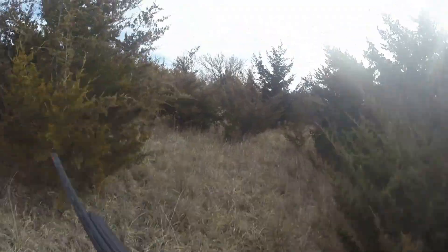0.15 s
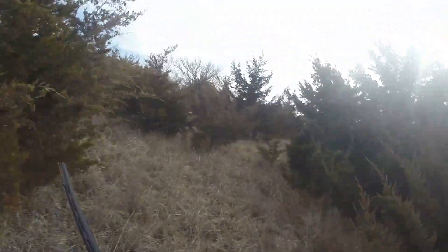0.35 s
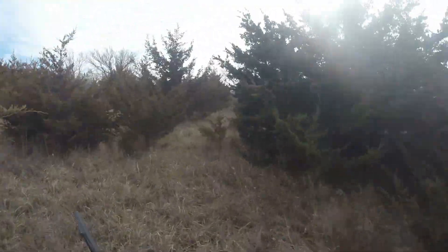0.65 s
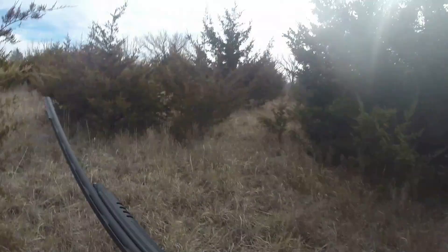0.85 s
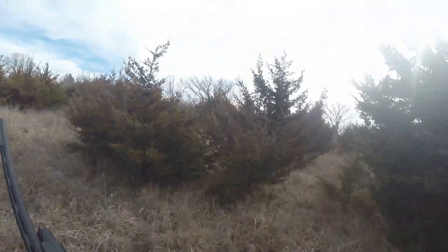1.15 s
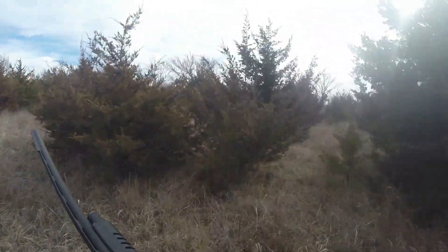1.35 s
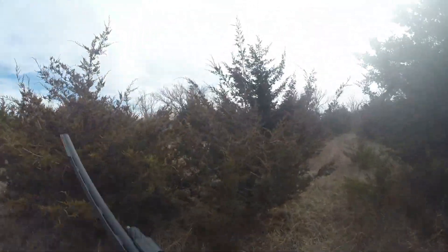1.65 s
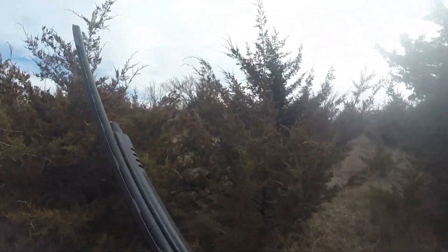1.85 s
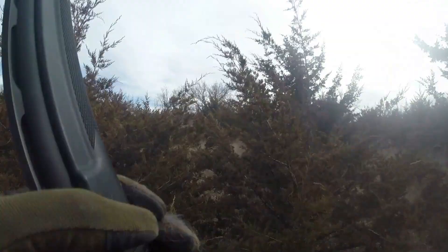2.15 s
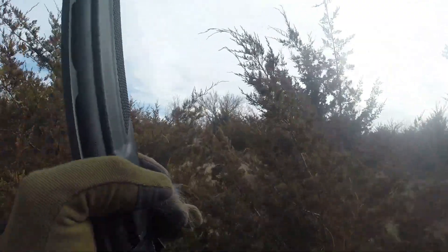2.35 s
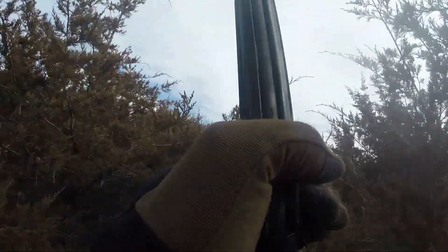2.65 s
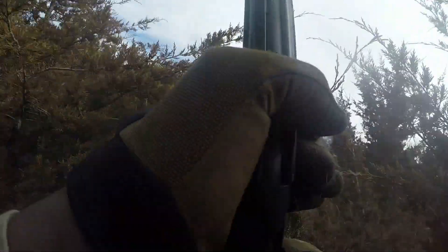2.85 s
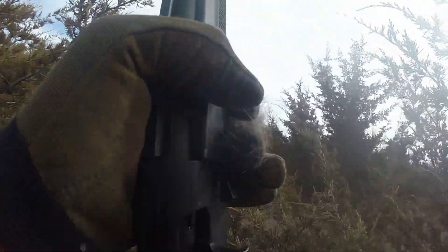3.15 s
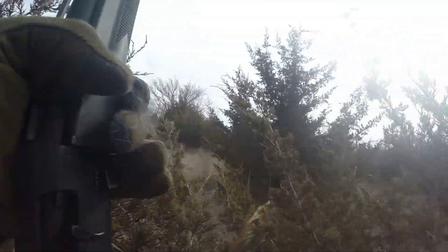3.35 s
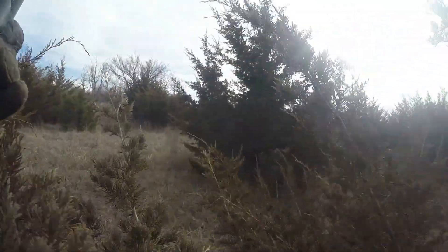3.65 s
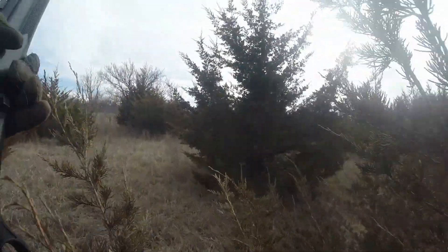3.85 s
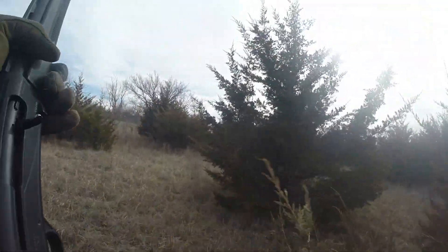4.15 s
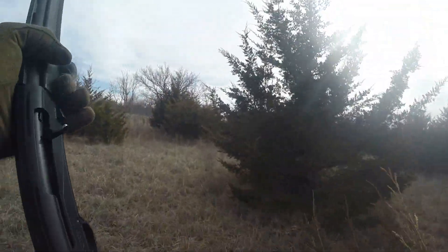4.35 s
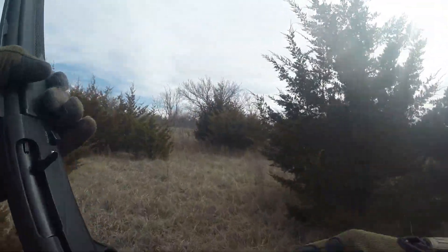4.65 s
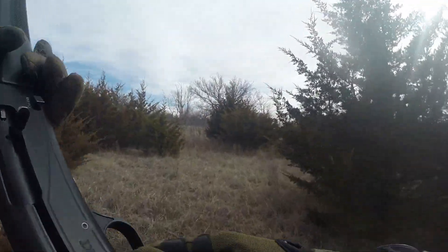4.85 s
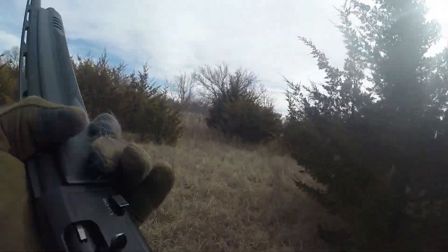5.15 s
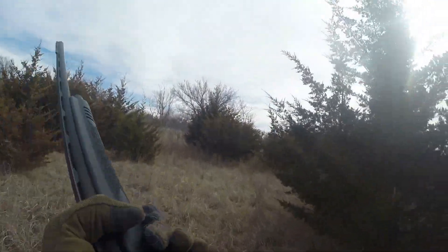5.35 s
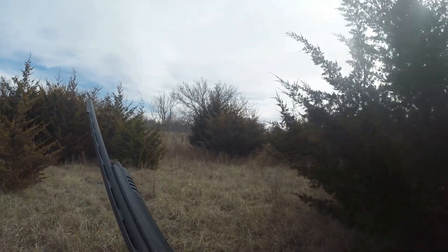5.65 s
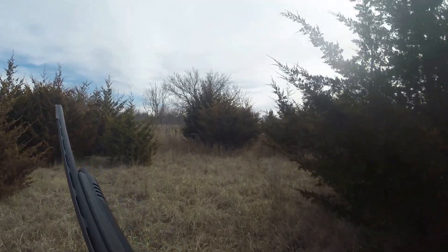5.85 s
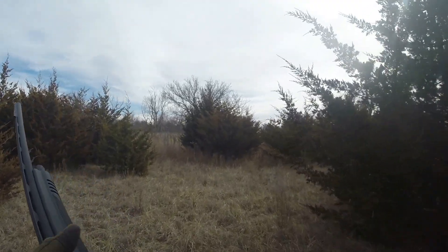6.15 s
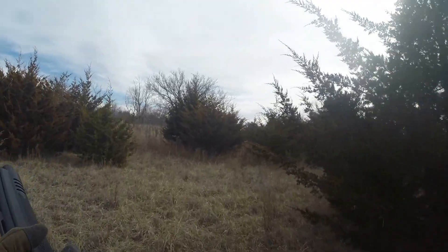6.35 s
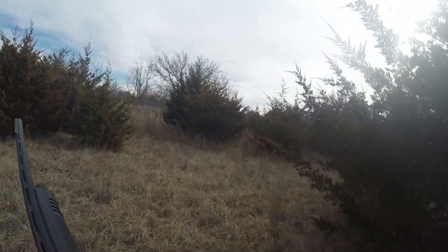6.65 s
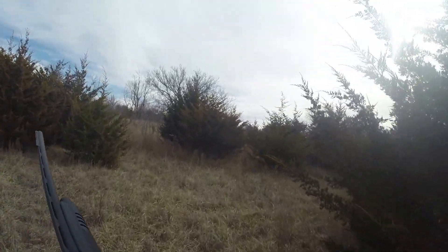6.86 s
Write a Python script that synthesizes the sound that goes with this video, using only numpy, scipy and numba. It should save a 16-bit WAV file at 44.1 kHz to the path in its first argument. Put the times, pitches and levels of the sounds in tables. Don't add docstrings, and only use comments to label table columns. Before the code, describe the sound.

Someone pushes through dry grass and cedar brush carrying a long gun. At first it is dense: low jolts, boxy plastic knocks, crunching stems and twig scuffs. It thins into gentle sweeps, then two very hard metal clacks cut through, about a second apart, briefly ducking everything around them. Afterwards only small ticks, bumps and faint grass stirring. Everything is muffled and hollow, heard from inside a body-mounted housing, dry and close.

```python
import sys
import numpy as np
from scipy import signal
from scipy.fft import rfft, irfft
from scipy.io import wavfile
from scipy.ndimage import uniform_filter1d, minimum_filter1d
from numba import njit

SR = 44100
rng = np.random.default_rng(int(sys.argv[2]) if len(sys.argv) > 2 else 0)


def invert_db(level):
    return 10 ** (np.asarray(level, dtype=float) / 20)


def wrap_up_sound(samples):
    columns = np.atleast_2d(samples).T
    tamed = np.clip(columns, -1, 1)
    steps = np.round(tamed * 32767).astype(np.int16)
    wavfile.write(sys.argv[1], SR, steps)


N = 309582

# pitch_hz, width_hz, level_db
HOLLOW_MODES = [(300, 150, -4), (571, 74, 12), (1034, 56, 8.5), (1270, 500, -0.5)]
SHELL_MODES = [(1950, 300, -5), (2380, 420, 0)]
PORT_MODES = [(3500, 450, -3), (4000, 450, 0), (5050, 400, -10), (6200, 700, -8)]
AIR_MODES = [(7860, 170, -10), (10020, 850, -10), (12100, 1600, -14.5)]


def rms_one(x):
    return x / np.sqrt(np.mean(x ** 2) + 1e-20)


def power_sum(*levels_db):
    return 10 * np.log10(sum(invert_db(2 * level) for level in levels_db))


def drift(rate_hz):
    r = np.exp(-80 * np.pi * rate_hz / SR)
    slow = signal.lfilter([1], [1, -2 * r, r * r], rng.standard_normal(N // 40 + 2002))[2000:]
    return np.interp(np.arange(N) / 40, np.arange(len(slow)), rms_one(slow))


def two_pole(x, hz, sign):
    k = np.tan(np.pi * min(hz, .45 * SR) / SR)
    b = np.array([1, 2 * sign, 1]) * (k * k if sign > 0 else 1)
    a = [1 + np.sqrt(2) * k + k * k, 2 * (k * k - 1), 1 - np.sqrt(2) * k + k * k]
    return signal.lfilter(b, a, x)


def low_pass(x, hz):
    return two_pole(x, hz, sign=1)


def high_pass(x, hz):
    return two_pole(x, hz, sign=-1)


def resonate(x, hz, width_hz):
    r = np.exp(-np.pi * width_hz / SR)
    a = [1, -2 * r * np.cos(2 * np.pi * hz / SR), r * r]
    return signal.lfilter([(1 - r * r) / 2, 0, (r * r - 1) / 2], a, x)


@njit
def glide(x, hz, r, step):
    y = np.zeros(len(x))
    for i in range(2, len(x)):
        y[i] = x[i] - x[i - 2] + 2 * r * np.cos(step * hz[i]) * y[i - 1] - r * r * y[i - 2]
    return y


def body(x, modes):
    return sum((-1) ** k * invert_db(db) * resonate(x, hz, width_hz) for k, (hz, width_hz, db) in enumerate(modes))


def coloured(spectrum):
    hz = np.arange(N // 2 + 1) * SR / N + 1
    points_hz, points_db = np.transpose(spectrum)
    shape = invert_db(np.interp(np.log(hz), np.log(points_hz), points_db, left=-80, right=-80))
    return rms_one(irfft(rfft(rng.standard_normal(N)) * shape, N))


def crackle(per_s, spread_db, smooth):
    sizes = invert_db(spread_db * np.minimum(rng.exponential(1, N), 5)) * rng.choice([-1, 1], N)
    born = rng.random(N) < per_s * invert_db(4 * drift(15)) / SR
    return rms_one(sizes * born) + smooth * rng.standard_normal(N)


def electronics():
    # pitch_hz, level_db_per_hz
    hiss_spectrum = [(120, -39.5), (200, -2.5), (585, -6.5), (798, -16), (1010, -9), (1190, -15),
                     (2380, -16), (3070, -19), (5110, -19), (12200, -44.5), (15500, -51.5)]
    # pitch_hz, width_hz, rms_db
    whine_lines = [(5060, 70, -70.5), (10000, 200, -85), (12645, 10, -94)]
    out = invert_db(-56.5) * coloured(hiss_spectrum)
    for hz, width_hz, db in whine_lines:
        whine = resonate(resonate(rng.standard_normal(N), hz, width_hz), hz, width_hz)
        out = out + invert_db(db) * rms_one(whine)
    return out


def rubbing():
    # time_s, rub_db
    pressure = [(0.0, -32.5), (0.2, -44.5), (0.39, -44.5), (0.6, -58), (0.75, -40), (1.06, -47), (1.4, -42),
                (1.66, -40), (1.93, -54.5), (2.19, -53.5), (2.45, -58.5), (3.1, -63.5), (3.44, -49),
                (3.7, -53), (4.45, -51), (4.75, -61), (5.25, -62.5), (7.02, -66)]
    # centre_s, half_length_s, level_db
    presses = [(0.124, .035, -29.5), (0.29, .03, -41), (0.436, .03, -41), (.51, .025, -36.5),
               (0.739, .04, -42.5), (0.827, 0.05, -38), (0.94, .04, -40), (1.018, 0.017, -43.5),
               (1.138, .04, -42.5), (1.306, 0.027, -37), (1.74, .03, -42), (1.884, .02, -49.5),
               (2.023, .025, -48.5), (2.153, 0.051, -43.5), (2.267, 0.045, -42), (2.334, .02, -44.5),
               (2.518, .025, -52.5), (2.64, 0.032, -59.5), (2.809, .05, -46), (3.627, .03, -54.5),
               (3.811, .05, -50), (4.123, .06, -54), (4.422, 0.033, -46), (4.541, .015, -40.5),
               (4.926, 0.028, -57), (5.04, .035, -54.5), (5.404, .03, -52), (5.477, 0.044, -55.5),
               (5.67, .04, -53), (5.792, .04, -51.5), (5.884, .04, -58), (6.372, 0.063, -60.5),
               (6.543, .04, -49.5), (6.668, .025, -58), (6.865, 0.056, -64.5), (6.982, .04, -65)]
    t = np.arange(0, N, 40) / SR
    bells = [db - 6 * ((t - s) / half_s) ** 2 for s, half_s, db in presses]
    return np.interp(np.arange(N) / SR, t, power_sum(np.interp(t, *np.transpose(pressure)), *bells))


def swishes():
    # centre_s, half_length_s, swish_db, airy_top_rel_db
    sweeps = [(0.143, 0.19, -55, -15), (0.38, 0.082, -53.5, -12.5), (0.747, 0.13, -61, -17),
              (0.98, 0.17, -57.5, -13), (1.253, 0.5, -61, -12.5), (1.443, 0.15, -76, -14),
              (1.658, 0.11, -60, -15), (2.003, 0.078, -56.5, -7.5), (2.2, 0.065, -54.5, -21),
              (2.64, 0.056, -58.5, -9), (2.8, 0.8, -60, -16), (3.2, 0.076, -52.5, -17),
              (3.363, 0.09, -58, -12.5), (4.055, 0.094, -49.5, -49), (4.287, 0.11, -55, -17),
              (4.485, 0.031, -56, -24), (5.4, 0.094, -72, -10), (5.54, 0.17, -66, -7),
              (5.85, 0.18, -86, -5), (6.3, 0.09, -73, 3), (6.547, 0.095, -84, -32),
              (6.805, 0.12, -92, -1.5)]
    still_db, still_air_db = -70, -76
    t = np.arange(0, N, 40) / SR
    bells = [(db - 6 * ((t - s) / half_s) ** 2, top_db) for s, half_s, db, top_db in sweeps]
    swish_db = power_sum(still_db, *[bell for bell, top_db in bells])
    air_db = power_sum(still_air_db, *[bell + top_db for bell, top_db in bells])
    return [np.interp(np.arange(N) / SR, t, level) for level in (swish_db, air_db)]


def rustle():
    shell_rub_db, shell_swish_db, port_rub_db = -2.5, 3.5, -21
    far_s, far_half_s, far_db = 6.32, 0.37, -64.5
    notch_hz, notch_width_hz, notch_depth = 2930, 620, 1
    rub_db = rubbing()
    grass_db, air_db = swishes()
    mid_db = power_sum(rub_db + shell_rub_db, grass_db + shell_swish_db)
    breeze_db = far_db - 6 * ((np.arange(N) / SR - far_s) / far_half_s) ** 2
    grass_db = power_sum(grass_db, breeze_db, rub_db + port_rub_db)
    stems = crackle(3500, spread_db=3.5, smooth=.9)
    together_db = 1.3 * drift(25)
    own_db = [1.3 * drift(30) for group in range(4)]
    hollow = rms_one(low_pass(body(stems, HOLLOW_MODES), 1600))
    shell = rms_one(low_pass(body(stems, SHELL_MODES), 3200))
    port = rms_one(low_pass(high_pass(body(stems, PORT_MODES), 3000), 7600))
    air = rms_one(high_pass(body(stems, AIR_MODES), 6500))
    levels_db = (rub_db, mid_db, grass_db, air_db)
    groups = zip(levels_db, own_db, (hollow, shell, port, air))
    mix = sum(invert_db(db + together_db + flicker_db) * part for db, flicker_db, part in groups)
    return mix - notch_depth * resonate(mix, notch_hz, notch_width_hz)


def crunch():
    level_db, follows_rub = -53.5, 0.98
    rub_db, grit = rubbing(), rng.standard_normal(N)
    breaks = np.abs(crackle(410, spread_db=1.5, smooth=0))
    bursts = grit * signal.lfilter([1], [1, -invert_db(-60 / (.02 * SR))], breaks)
    sound = low_pass(body(bursts, HOLLOW_MODES), 2300) + 0.76 * body(bursts, SHELL_MODES)
    sound = sound + 0.024 * body(bursts, PORT_MODES) + 0.28 * resonate(bursts, 3300, 1200)
    return invert_db(level_db + follows_rub * (rub_db - rub_db.mean())) * rms_one(sound)


def jolts():
    # time_s, level_db
    stir = [(0, -30.5), (.6, -40.5), (1.9, -42.5), (2.45, -53.5), (3.44, -48.5), (3.8, -49.5), (4.75, -54),
            (5.3, -55), (7.02, -52.5)]
    # peak_s, peak_db, build_up_s, settling_s (both over 20 dB)
    strides = [(.035, -8, 0.06, 0.071), (0.149, -14, 0.076, 0.022), (0.211, -17.5, 0.09, 0.039),
               (.343, -8.5, 0.028, 0.028), (0.502, -15.5, 0.13, 0.12), (.92, -12, .1, 0.038),
               (1.038, -25.5, .04, 0.019), (1.161, -27.5, 0.077, 0.23), (1.323, -11.5, 0.071, 0.053),
               (1.502, -8, 0.014, 0.015), (1.77, -17.5, 0.12, 0.063), (2.262, -21, .08, 0.09),
               (2.788, -37.5, 0.42, 0.4), (3.469, -25, 0.011, 0.077), (3.659, -38.5, 0.11, 0.036),
               (4.35, -45, .4, .3), (4.522, -38, .06, 0.036), (4.69, -40.5, 0.078, 0.013),
               (1.82, -22, 0.039, 0.023), (5.719, -38, 0.099, 0.075), (6.01, -39, 0.033, .05),
               (6.229, -50.5, 0.29, 0.21), (6.58, -47.5, 0.62, 0.29), (7.0, -50.5, 0.49, 0.18),
               (1.91, -31.5, .025, 0.042), (5.39, -45.5, .06, .08), (5.53, -40, 0.054, 0.066),
               (5.88, -46, .15, 0.071), (6.46, -50.5, .12, 0.074), (3.15, -44, .15, 0.28),
               (.67, -33.5, .05, 0.14), (1.63, -32, .06, 0.064), (5.62, -46, .05, 0.06)]
    t = np.arange(0, N, 40) / SR
    level_db = np.interp(t, *np.transpose(stir))
    for s, db, rise_s, fall_s in strides:
        level_db = np.maximum(level_db, db - 20 * np.maximum((s - t) / rise_s, (t - s) / fall_s))
    return np.interp(np.arange(N) / SR, t, level_db)


def shake():
    # pitch_hz, level_db_per_hz
    rumble_spectrum = [(12, -35), (20, 7.5), (65, -2), (124, -8), (155, -2.5), (201, -14), (293, -18),
                       (450, -44.5), (580, -62), (990, -120)]
    level_db = jolts()
    sway_hz = 116 + 1.28 * level_db
    rumble = coloured(rumble_spectrum)
    swing = glide(rng.standard_normal(N), sway_hz, np.exp(-np.pi * 40 / SR), 2 * np.pi / SR)
    swing = rms_one(low_pass(low_pass(swing, 200), 300))
    hard = np.clip((level_db + 65.0) / 35, .05, 1)
    both = swing * hard + rumble * (1.1 - 0.21 * hard)
    envelope = np.sqrt(uniform_filter1d(both ** 2, size=1100))
    lumps_db = 3 * drift(39)
    sway = invert_db(level_db + lumps_db) * rms_one(both / (envelope + 0.6))
    fittings = crackle(1500, spread_db=4.0, smooth=0.21)
    chatter = body(fittings, HOLLOW_MODES) + .45 * body(fittings, SHELL_MODES)
    chatter = chatter - .25 * resonate(fittings, 3400, 900)
    chatter = rms_one(low_pass(low_pass(chatter, 3800), 4500))
    return low_pass(low_pass(sway, 370), 290) + invert_db(level_db - 16.5) * chatter


def pings():
    # start_s, peak_db, pitch_hz, length_s
    contacts = [(.005, -25.5, 300, 0.13), (0.325, -25, 300, 0.037), (0.428, -42, 4840, 0.0021),
                (0.545, -7, 593, 0.0034), (.875, -13, 275, 0.019), (0.881, -21, 596, 0.012),
                (1.345, -44, 9000, 0.0018), (1.3608, -8, 3370, 0.0015), (1.359, -28.5, 8800, 0.0011),
                (1.365, -49, 9000, .002), (1.499, -13.5, 2150, 0.0043), (1.516, -17, 553, 0.0063),
                (1.519, -29, 3380, 0.0028), (1.597, -32, 4120, .006), (1.594, -42, 10500, .005),
                (1.597, -20.5, 533, 0.0056), (1.739, -24.5, 5100, 0.0039), (1.915, -37, 1810, 0.0042),
                (2.061, -53, 3700, .002), (2.631, -42, 5930, .004), (2.816, -40, 5950, 0.0039),
                (2.87, -44, 2900, .004), (2.901, -45.5, 300, 0.21), (3.143, -33, 2230, 0.023),
                (3.304, -53, 9000, .003), (3.349, -36.5, 685, 0.013), (3.67, -55, 7500, 0.0024),
                (4.124, -37.5, 1020, 0.036), (4.269, -49, 300, .04), (4.288, -32.5, 2210, 0.033),
                (4.504, -40, 4000, .004), (4.544, -44, 600, 0.0096), (4.575, -16, 3310, 0.0037),
                (4.585, -44.5, 7800, 0.004), (4.579, -20, 727, 0.019), (4.928, -64.5, 2220, .004),
                (4.99, -62, 10540, 0.0016), (5.071, -45, 578, 0.016), (5.119, -62.5, 12100, 0.0031),
                (6.377, -54, 2990, .015), (6.138, -51, 3000, 0.022), (0.8533, -12.5, 2110, 0.006),
                (5.44, -44.5, 900, 0.0046), (6.608, -46, 401, .008), (6.511, -53, 300, 0.044),
                (4.508, -31, 143, 0.045), (4.66, -37, 137, 0.039), (3.592, -28, 3950, 0.0022),
                (3.525, -47, 6100, .002), (3.55, -47, 6100, .002),
                (.034, -38, 6300, .006), (.0415, -16, 2200, .005), (.0415, -15, 1200, .006),
             (.064, -45, 8000, .003), (.073, -47, 8500, .003), (.128, -19, 3500, .004),
             (.217, -38, 3500, .003), (.402, -17, 2100, .007), (.425, -35, 3900, .003),
             (.523, -43, 6000, .008), (.523, -50, 9500, .003), (.53, -49, 8500, .004),
             (.8745, -25, 5500, .003), (.937, -44, 7800, .01), (.98, -30, 600, .014),
             (1.03, -32, 2200, .012), (1.448, -45, 6300, .01), (1.452, -53, 9500, .005),
             (1.488, -21, 2100, .005), (1.7385, -14, 1400, .006), (1.7385, -17, 2600, .005),
             (2.87, -52, 5800, .003), (4.504, -45, 6500, .004), (4.5715, -20, 5800, .005),
             (4.5785, -29, 10800, .003), (4.583, -31, 2300, .004), (4.612, -39, 130, .04),
             (4.941, -55, 6000, .004), (5.375, -57, 5500, .004), (5.384, -56, 5500, .004),
             (5.61, -50, 600, .006), (5.61, -54, 2300, .005), (5.88, -48, 370, .05), (5.94, -48, 400, .06),
             (6.03, -50, 420, .06), (6.07, -50, 330, .05), (6.13, -52, 350, .04)]
    out, t = np.zeros(N + 8000), np.arange(8000) / SR
    hits = contacts
    for (s, db, hz, length_s), noise in zip(hits, rng.standard_normal((len(hits), 8000))):
        puff = noise * (t / length_s) ** .5 * np.exp(-3.0 * t / length_s)
        width_hz = 0.28 * hz
        ping = resonate(resonate(puff, hz, width_hz), hz, width_hz)
        i = round(s * SR)
        out[i:i + 8000] += invert_db(db) * ping / np.abs(ping).max()
    return out[:N]


def knocks():
    # start_s, peak_db, pitch_hz, bright_db
    raps = [(0.041, -9.5, 1210, -31), (0.1148, -13, 1480, -14), (.1275, -7, 1070, -11.5),
            (.167, -12.5, 2130, -43), (0.177, -21, 650, -27), (.5443, -4, 1120, -13.5),
            (0.6137, -23, 1500, -30), (0.8741, -3, 1260, -14.5), (0.883, -10.5, 1800, -20),
            (1.3383, -22, 1130, -33), (1.3588, -17, 3550, -11), (1.364, -41, 3480, -6),
            (1.5189, -22, 1100, -36), (1.6615, -18.5, 1230, -31), (1.8047, -14, 1180, -12),
            (2.3011, -12, 2080, -18), (2.7181, -34.5, 2220, -20), (2.9551, -25, 1310, -30),
            (3.523, -49, 2130, -32), (3.541, -28, 1830, -4), (3.5567, -43.5, 2200, 15.5),
            (3.5916, -14, 2200, -30), (1.5899, -23, 2159, 4), (5.372, -43, 2120, -19),
            (5.6617, -41, 1050, -18), (5.6991, -36.5, 640, -25), (6.008, -36, 1270, -26.5),
            (6.404, -40.5, 3900, -12), (6.5586, -50, 1040, -16)]
    # start_s, peak_db, pitch_hz, bright_db
    scuffs = [(.1494, -19, 2020, -31), (0.2678, -30, 1300, -16), (0.38, -25.5, 1270, -30),
              (0.4011, -22.5, 2140, -30), (0.4313, -21.5, 1170, -15), (0.47, -24.5, 1030, -29),
              (0.8515, -12.5, 1500, -25), (.932, -29.5, 2130, -4), (1.136, -33.5, 960, -26),
              (1.484, -16.5, 1220, -16), (1.4977, -21.5, 2200, -43), (5.44, -45, 1490, -22),
              (1.7374, -12, 1370, -14), (1.784, -26.5, 1060, -14), (2.2395, -34, 1030, -22),
              (2.803, -34.5, 1320, -4), (2.8282, -36, 1370, -5), (3.145, -42.5, 3860, 1),
              (3.39, -47.5, 733, -3), (3.5114, -20.5, 2140, -10.5), (4.2906, -59, 2180, 4),
              (4.8024, -42, 1033, -16), (5.3868, -34.5, 1270, -26), (6.535, -42, 2124, -8.5),
              (6.525, -43, 1890, -11), (6.577, -44, 1300, -19.5), (5.36, -49, 2010, -26),
              (2.148, -32, 1990, -12), (4.66, -37.5, 3600, -19)]
    # start_s, peak_db, pitch_hz, bright_db
    bumps = [(0.2044, -26, 2030, -32), (0.3405, -22.5, 1370, -35), (0.3543, -25, 650, -29),
             (0.631, -35, 990, -31), (1.0116, -28, 1880, -17), (1.291, -27, 1030, -12),
             (1.4241, -37.5, 2070, -12), (1.447, -36.5, 1030, -5), (1.549, -39, 1010, -11),
             (1.912, -39, 634, -37), (1.941, -36, 650, -28), (2.588, -43, 680, -18),
             (3.594, -27.5, 900, -34), (3.669, -55, 1050, -7), (4.1768, -42.5, 2050, -23),
             (4.3207, -36.5, 670, -26), (4.4248, -42.5, 990, 0), (4.505, -35.5, 1040, -19),
             (4.525, -27.5, 1620, -23), (4.619, -21, 563, -43.5), (4.6457, -25.5, 571, -52.5),
             (4.676, -36, 592, -52), (4.726, -46, 553, -57.5), (4.9411, -44, 664, -3),
             (5.049, -49, 640, -19), (5.508, -45.5, 820, -13), (5.637, -38.5, 1860, -11),
             (5.798, -44, 2040, -20), (6.6317, -46.5, 2020, -1), (0.5449, -23, 1030, -40)]
    # hollow_db, t60_s
    kinds = [
        (-12.5, 0.017),
        (-7, 0.12),
        (3.5, 0.032),
    ]
    out, t = np.zeros(N + 4000), np.arange(4000) / SR
    hits = [row + kind for rows, kind in zip((raps, scuffs, bumps), kinds) for row in rows]
    noises = rng.standard_normal((len(hits), 4000))
    for (s, db, hz, bright_db, hollow_db, t60_s), noise in zip(hits, noises):
        burst = noise * np.minimum(t / (0.0055 * t60_s), 1) * invert_db(-60 * t / np.clip(t60_s, .004, .15))
        shell = min(hz / 2100, 1) ** 0.25
        spot = resonate(burst, hz, 0.17 * hz) + 0.54 * shell * body(burst, SHELL_MODES)
        spot = spot - 0.36 * resonate(burst, 2900, 740)
        spot = low_pass(low_pass(spot, 0.5 * hz + 1500), 2900)
        hollow = low_pass(body(burst, HOLLOW_MODES), 900)
        bright = high_pass(body(burst, PORT_MODES) + 0.42 * body(burst, AIR_MODES), 1900)
        cut_hz = 4500 * invert_db(0.35 * (bright_db + 6.5))
        bright = low_pass(low_pass(bright, cut_hz), cut_hz)
        gains = invert_db(np.array([0, hollow_db + 5.0, bright_db]))
        i = round(s * SR)
        out[i:i + 4000] += invert_db(db) * sum(g * p / np.abs(p).max() for g, p in zip(gains, (spot, hollow, bright)))
    return out[:N]


def snaps():
    # start_s, blow_db, burst_s, low_ring_db, middle_ring_db, high_ring_db
    blows = [
        (0.5434, -48, .0013, -31, -37, -69),
        (0.876, -33, 0.00051, -27, -48, -70),
        (3.464, 12, 0.0023, -15, -4, -30),
        (4.5678, 10.5, 0.0029, -62.5, -64, -61),
        (4.5709, 9.5, 0.0026, -4, -12, -18.5),
    ]
    # pitch_hz, t60_s, ring_group_index, level_db
    metal_modes = [(1814, .24, 0, 0), (1848, .12, 0, -16), (2132, .15, 1, 0), (2702, .15, 2, -10),
                   (2900, .13, 2, 0), (3138, .16, 2, -5), (3628, .1, 2, -8), (4390, .07, 2, -9)]
    from_hz, to_hz, sweep_s = 4500, 2250, .0008
    out, t = np.zeros(N + 16000), np.arange(16000) / SR
    turns = to_hz * t + (from_hz - to_hz) * sweep_s * (1 - np.exp(-t / sweep_s))
    wave = np.sin(2 * np.pi * turns)
    for (s, blow_db, burst_s, *ring_db), noise in zip(blows, rng.standard_normal((len(blows), 16000))):
        contact = invert_db(-60 * np.maximum(t - .6 * burst_s, 0) / (2.8 * burst_s))
        clean = float(burst_s < .0028)
        grit = (1.12 - clean) * 3.2 * resonate(resonate(noise, 2200, 800), 2250, 800)
        grit = grit + .16 * resonate(noise, 4200, 2500)
        grit = grit + (0.03 + .3 * (1 - clean)) * low_pass(high_pass(noise, 5000), 14000)
        grit = grit + 0.38 * clean * resonate(noise, 620, 900)
        rattle = low_pass(low_pass(high_pass(noise, 1400), 4100), 4100) * invert_db(-60 * t / 0.017)
        thud = (clean + .08) * invert_db(-14.5) * np.sin(2 * np.pi * 90 * t) * invert_db(-60 * t / 0.018)
        ring = sum(invert_db(ring_db[group] + db - 60 * t / t60_s) * np.sin(2 * np.pi * hz * t)
                   for hz, t60_s, group, db in metal_modes)
        blow = low_pass(contact * (clean * wave + grit) + rattle + thud, 10000)
        i = round(s * SR)
        out[i:i + 16000] += invert_db(blow_db) * blow + ring * (1 - np.exp(-t / 0.0034))
    return out[:N]


def scene():
    return (electronics() + rustle() + crunch() + shake() + pings() + knocks() + snaps())[None]


def held(over_db, release_db_per_s, size):
    ramp_db = release_db_per_s * np.arange(N) / SR
    return uniform_filter1d(np.maximum.accumulate(over_db + ramp_db) - ramp_db, size=size)


def band_limit(x):
    return signal.sosfilt(signal.butter(12, 16060, fs=SR, output="sos"), x)


def record(dry):
    limit_db, ahead_s = 2.5, .009
    quick_db, quick_depth, quick_lag_s = -4, 1.224, 0.01
    over_db = np.maximum(20 * np.log10(np.abs(dry[0]) + 1e-9) - limit_db, 0)
    early_db = -minimum_filter1d(-over_db, size=2 * round(ahead_s * SR) + 1)
    ducked = dry * invert_db(-.85 * held(early_db, release_db_per_s=13, size=60))
    late_db = np.maximum(20 * np.log10(np.abs(ducked[0]) + 1e-9) - quick_db, 0) * quick_depth
    late_db = held(late_db, release_db_per_s=66, size=300)
    ducked = ducked * invert_db(-np.interp(np.arange(N) - quick_lag_s * SR, np.arange(N), late_db))
    limited = ducked / (1 + np.abs(ducked) ** 12) ** (1 / 12)
    top_cut = signal.cheby2(10, 50, 15900, fs=SR, output="sos")
    return band_limit(signal.sosfilt(top_cut, .96 * limited))


dry = scene()
out = record(dry)
wrap_up_sound(out)
```